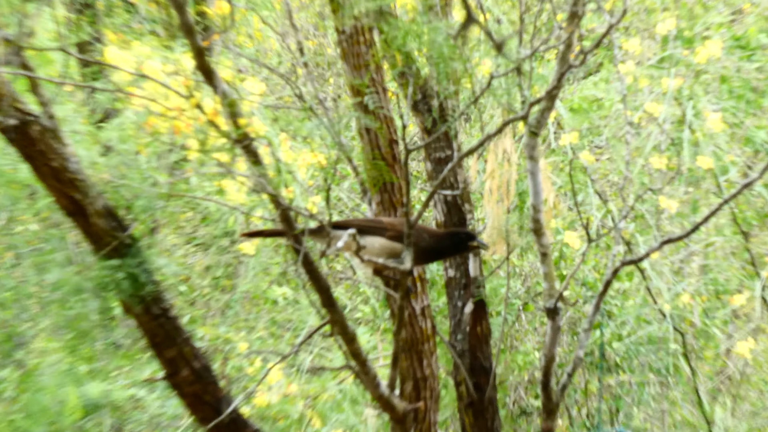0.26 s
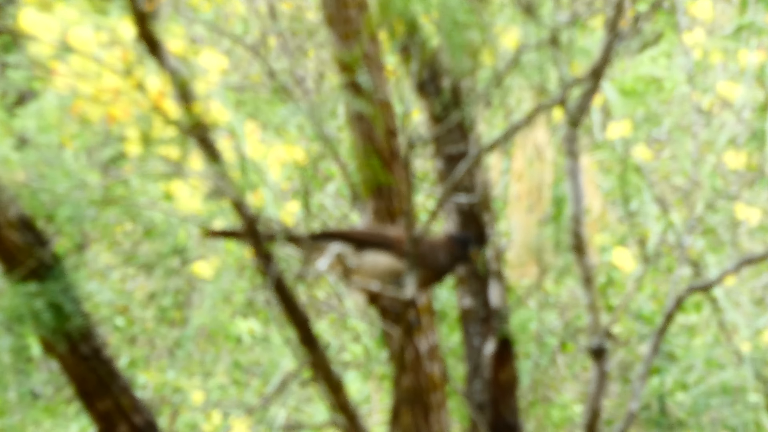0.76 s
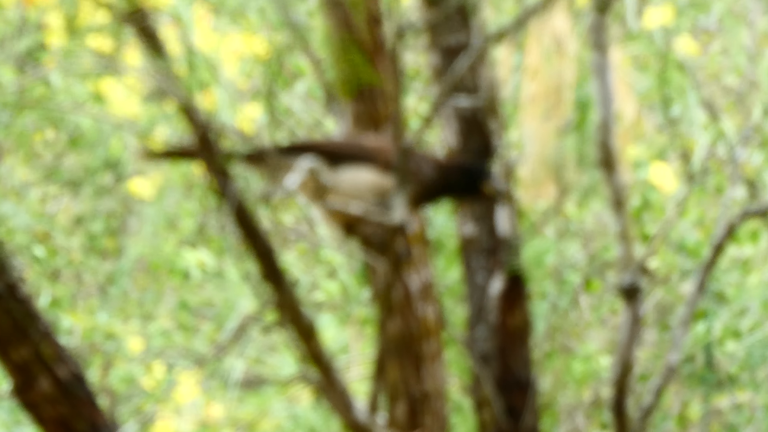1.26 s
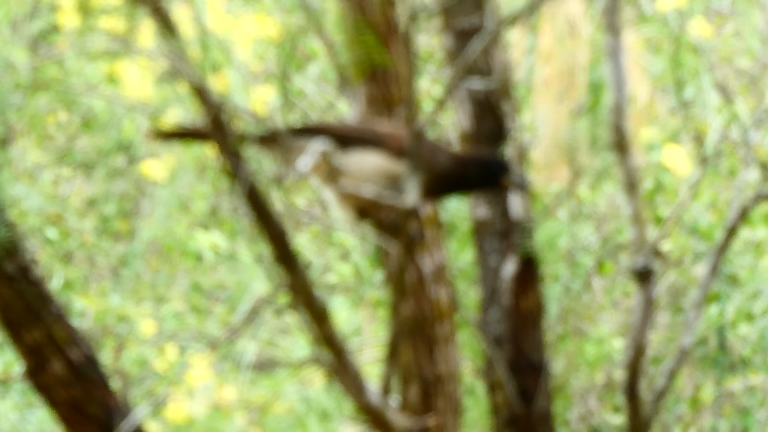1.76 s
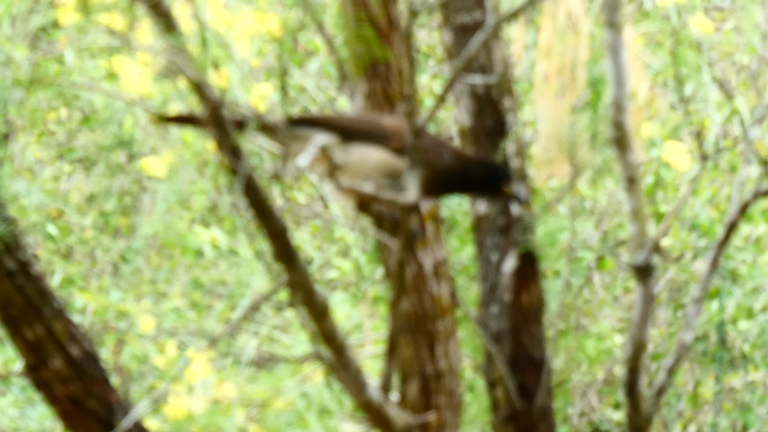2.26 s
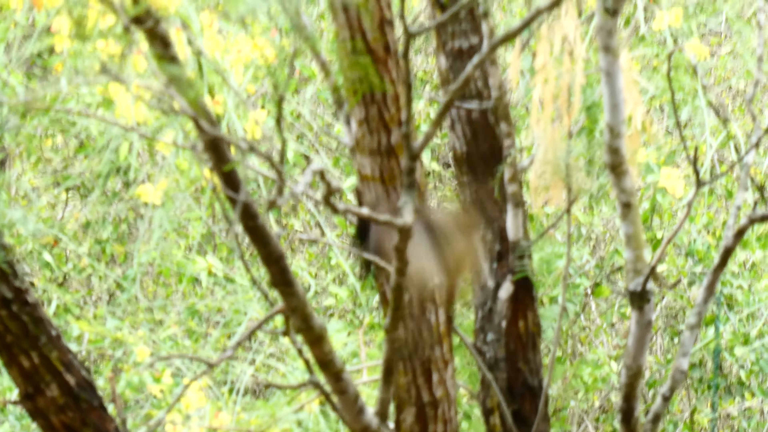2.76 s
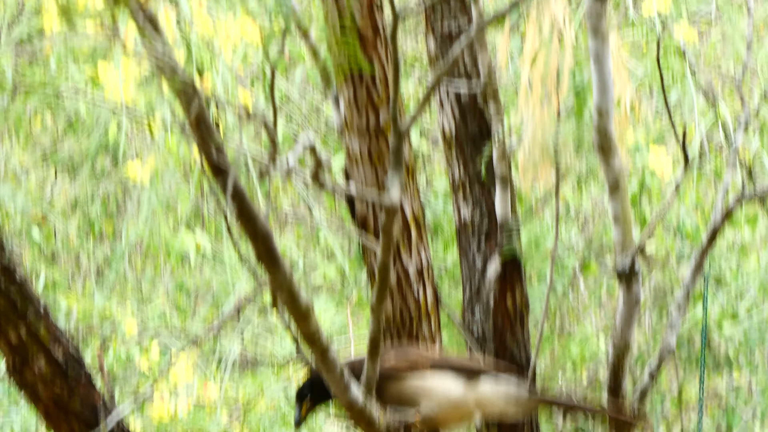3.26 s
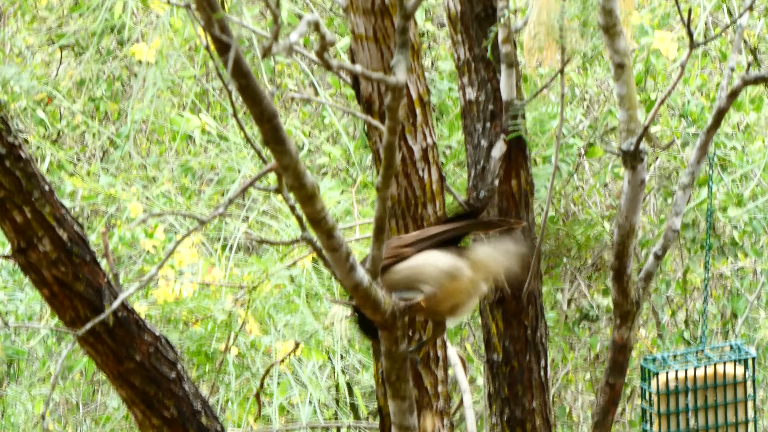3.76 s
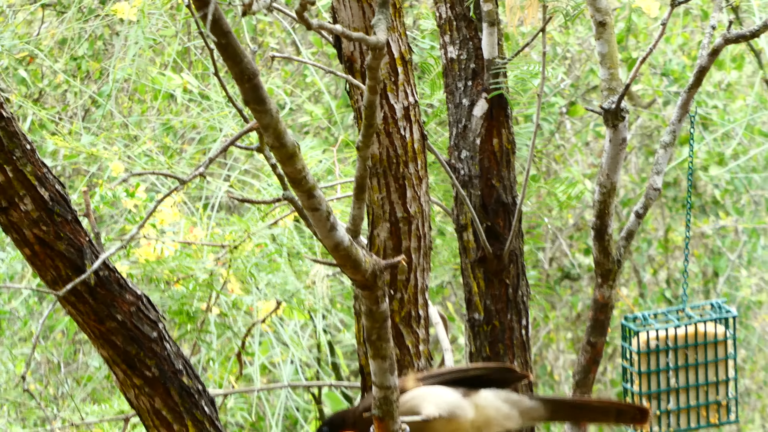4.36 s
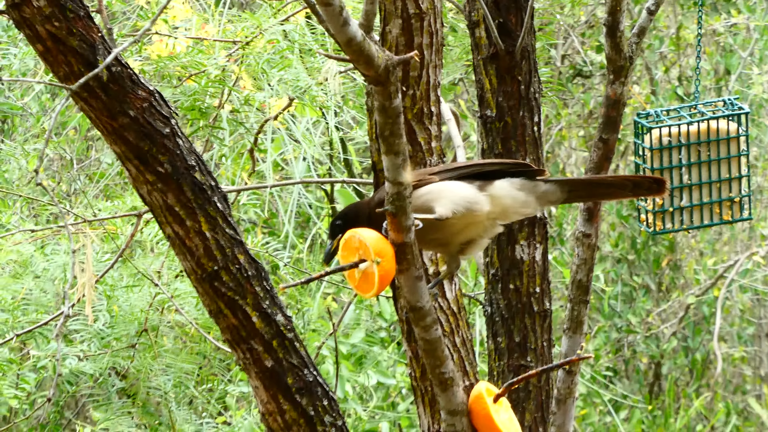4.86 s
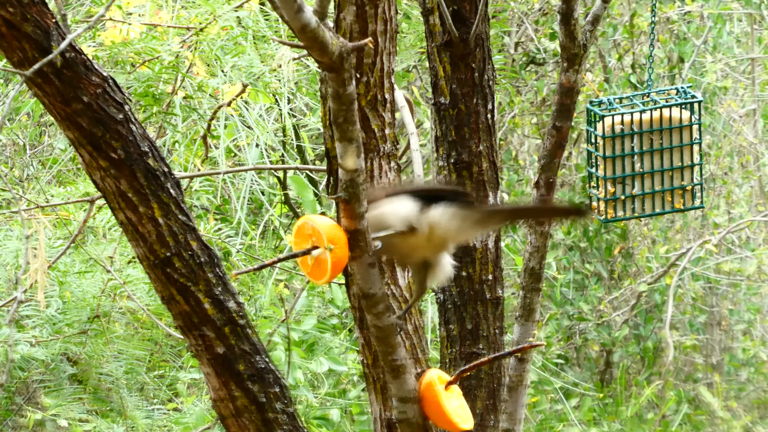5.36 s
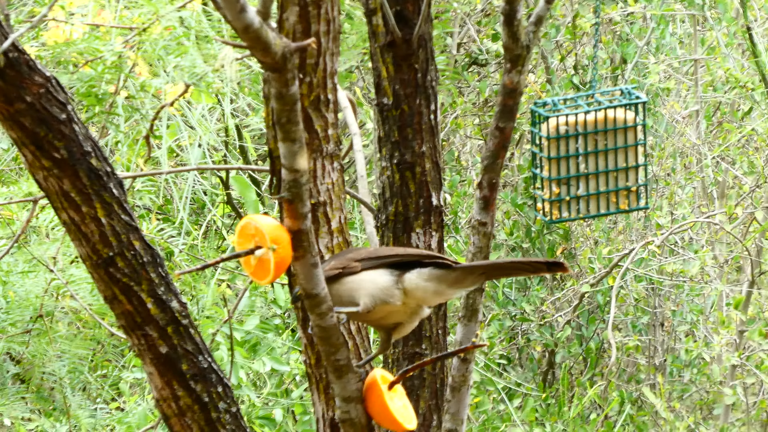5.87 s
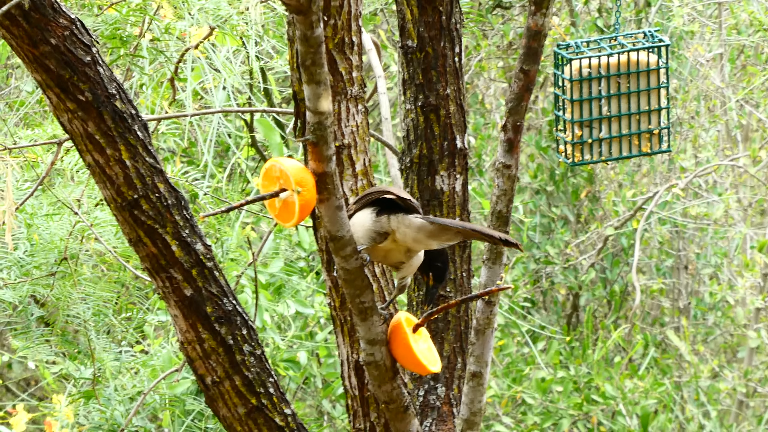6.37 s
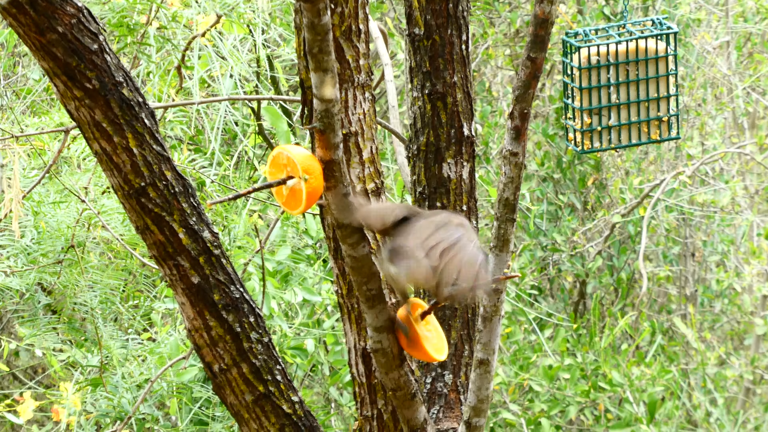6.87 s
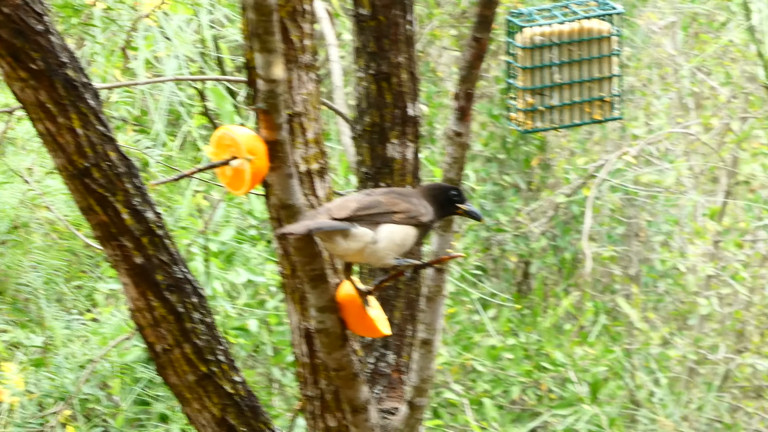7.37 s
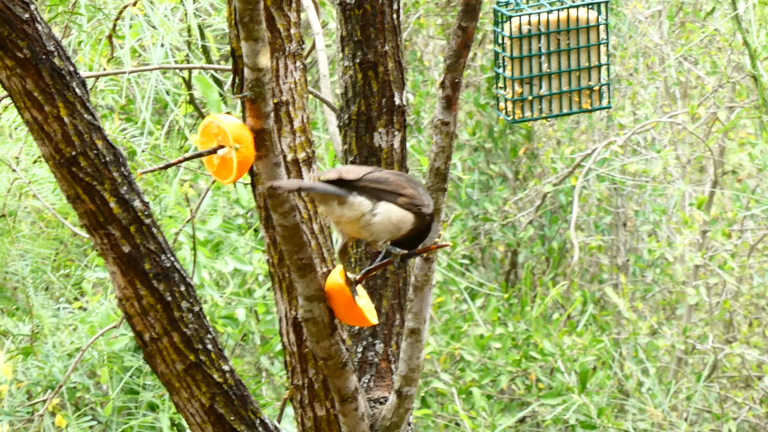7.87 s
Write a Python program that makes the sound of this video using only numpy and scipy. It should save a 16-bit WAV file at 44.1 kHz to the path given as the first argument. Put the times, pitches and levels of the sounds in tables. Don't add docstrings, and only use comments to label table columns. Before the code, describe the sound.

Four rough, nasal jay screams come first, close and bright, with a short woodland echo. Then the place is quiet: a low, throbbing frog hum, thin insect noise and gentle leaf hiss. Far small birds give a tumbling trill, scattered peeps and three brief warbling songs. Small dry clicks and loose lens rattles betray the hand-held camera microphone near the end.

```python
import sys
import numpy as np
from scipy import signal
from scipy.fft import rfft, irfft, next_fast_len
from scipy.io import wavfile
from scipy.ndimage import uniform_filter1d, map_coordinates

SR = 44100
rng = np.random.default_rng(int(sys.argv[2]) if len(sys.argv) > 2 else 0)


def waveform_to_disk(signal):
    frames = np.transpose(np.atleast_2d(signal))
    scaled = np.clip(frames, -1, 1) * 32767
    samples = np.round(scaled).astype(np.int16)
    wavfile.write(sys.argv[1], SR, samples)


def nominal_scale(level):
    x = np.asarray(level, float) / 20
    return 10 ** x


N = 357651
T = np.arange(N) / SR
TOP_HZ = 15750
CALLING = N // 3


def unit(x):
    return x / np.sqrt(np.mean(x ** 2) + 1e-20)


def along(points, hz):
    f, v = np.transpose(points)
    return np.interp(np.log(hz + 1), np.log(f + 1), v)


def curves(rows):
    s, *cols = np.transpose(rows)
    return [np.interp(T, s, c) for c in cols]


def wobble(rate_hz, size=N):
    knots = rng.standard_normal(int(N * rate_hz / SR) + 4)
    return map_coordinates(knots, [T[:size] * rate_hz])


def filtered(x, response):
    m = next_fast_len(N + SR // 2)
    return irfft(rfft(x, m) * response(np.fft.rfftfreq(m, 1 / SR)), m)[..., :N]


def resonances(modes):
    def response(f):
        total = 0
        for k, (centre, width, db) in enumerate(modes):
            loss = 1j * f * abs(width)
            total = total + (-1) ** k * nominal_scale(db) * loss / (centre * centre - f * f + loss)
        return total
    return response


def add(track, s, sound):
    track[round(s * SR):][:len(sound)] += sound


def progress(length_s):
    return np.arange(round(length_s * SR)) / (length_s * SR)


def sine(hz):
    return np.sin(2 * np.pi * np.cumsum(hz) / SR)


# start_s, voice_clears_s, voice_breaks_s, end_s, start_roughness (0-1)
CRIES = [
    (0, .06, .175, .4, .2),
    (.72, .835, .97, 1.075, .8),
    (1.27, 1.4, 1.5, 1.69, .8),
    (1.88, 1.975, 2.07, 2.235, .9),
]


def through_cries(start, clears, breaks, end):
    stages = (start, clears, breaks, end)
    return curves([(s, v) for cry in CRIES for s, v in zip(cry, stages)])[0]


CLEAR = (.13, .14, .08, .07)


def roughness():
    settle_s, break_s = .025, .045
    points = []
    for (start, clears, breaks, end, hoarse), clear in zip(CRIES, CLEAR):
        points += [(start, hoarse), ((start + clears) / 2, .46 * hoarse),
                   (clears - settle_s, max(hoarse / 3, clear)),
                   (clears, clear), (breaks, clear), (breaks + break_s, .62), (end, .85)]
    return curves(points)[0]


# time_s, level_db, mouth_khz
EFFORT = [
    [(0, -23.5, 1.9), (0.022, -26.5, 3.4), (0.036, -36.5, 2.1), (0.076, -27.5, 3.6), (0.105, -29.5, 3.8),
     (0.16, -32.0, 1.85), (0.22, -39, 1.75), (0.33, -50.5, 1.4), (0.4, -55.5, 2.26)],
    [(0.72, -60.5, 1.75), (0.772, -29.5, 2.2), (0.8, -36, 1.7), (0.83, -38.5, 2.94), (0.89, -30.5, 3.55),
     (0.914, -35, 2.46), (0.952, -36, 1.7), (1.025, -49.5, 1.85), (1.075, -63, 2.6)],
    [(1.275, -57, 2.2), (1.315, -29.5, 2.35), (1.356, -35.1, 2.85), (1.39, -25.5, 4.56),
     (1.426, -28.5, 1.6), (1.468, -27.5, 1.68), (1.49, -32.5, 2.18), (1.55, -39, 2.76), (1.69, -55, 4.7)],
    [(1.88, -57, 2.1), (1.914, -27, 2.06), (1.965, -28.5, 3.42), (1.98, -30.5, 2.65), (2.02, -27.5, 2.3),
     (2.06, -27, 2.24), (2.09, -33, 1.83), (2.12, -39, 1.8), (2.235, -50.5, 2.43)],
]
# time_s, hollow_khz
HOLLOW = [
    [(0, 3.6), (.024, 3.6), (.034, 2.3), (.092, 2.4), (.115, 3.4), (.14, 2.8), (.175, 5.35), (.22, 5.6),
     (.36, 6.5)],
    [(.745, 2.2), (.785, 2.25), (.8, 2.3), (.815, 2.3), (.885, 1.5), (.92, 4), (.98, 4.1), (1.07, 4.3)],
    [(1.29, 1.3), (1.325, 1.7), (1.36, 2.03), (1.39, 7.3), (1.42, 6.9), (1.46, 6.1), (1.488, 2.5),
     (1.525, 1.9), (1.59, 3.8)],
    [(1.905, 1.51), (1.93, 2.2), (1.968, 1.38), (1.99, 4.2), (2.012, 4.2), (2.045, 4.9), (2.08, 3.0),
     (2.11, 6.1), (2.17, 4.5)],
]
# freq_hz, level_db
WINDPIPE = [(1500, -3), (2000, 0.1), (2400, 1.5), (3100, 0.1), (3700, -4), (4400, 3), (5000, -3),
            (6200, -13)]


def overtones(hz):
    mouth_octaves, hollow_octaves = .44, .24
    n = len(hz)
    effort_db, mouth_khz = [c[:n] for c in curves(np.vstack(EFFORT))]
    hollow_khz = curves(np.vstack(HOLLOW))[0][:n]
    chest_db = through_cries(-43, -21, -13, -11)[:n]
    pitches = np.arange(2, 6)[:, None] * hz

    def near(khz, octaves):
        return np.exp(-(np.log2(pitches / 1000 / khz) / octaves) ** 2)

    colour_db = along(WINDPIPE, pitches)
    colour_db = colour_db + 12 * near(mouth_khz, mouth_octaves)
    colour_db += 5 * near(2 * mouth_khz, mouth_octaves / 2)
    colour_db -= 19 * near(hollow_khz, hollow_octaves)
    total_db = 10 * np.log10(np.sum(nominal_scale(colour_db) ** 2, axis=0))
    return effort_db + chest_db, effort_db + colour_db - total_db


# time_s, pitch_hz
PITCH = [
    [(0, 1198), (.027, 1173), (.032, 1118), (.115, 1066), (.172, 1000), (.182, 878), (.27, 847),
     (.276, 949), (.36, 864)],
    [(.72, 761), (.76, 942), (.765, 1136), (.8, 1115), (.81, 1036), (.84, 1008), (.885, 996), (.955, 910),
     (1.07, 895)],
    [(1.304, 954), (1.306, 1198), (1.336, 1180), (1.341, 1070), (1.395, 1105), (1.407, 1040), (1.462, 1011),
     (1.482, 880.7), (1.69, 712)],
    [(1.91, 921), (1.912, 1227), (1.97, 1221), (1.972, 1041), (2.064, 982), (2.073, 921), (2.1, 928),
     (2.112, 879), (2.23, 850)],
]
# freq_hz, density_db_per_hz
THROAT = [(590, -57), (1000, -18.5), (1600, -21), (1770, -8), (2160, -9), (2420, -3), (3040, 0.5),
          (3370, -40), (3960, 0.5), (4390, 3.5), (7530, -29.5), (8840, -9), (15500, -36)]
# freq_hz, level_db
HIGH = [(5500, -26), (7000, -29.5), (9000, -26), (11000, -32), (15000, -50)]
SHINE_DB = (1.5, 1.5, 0.5, -0.5)


def jay():
    n = CALLING
    hz = curves(np.vstack(PITCH))[0][:n]
    chest_db, overtone_db = overtones(hz)
    rough = roughness()[:n]
    gate = sum((T[:n] >= start) & (T[:n] <= end) for start, _, _, end, _ in CRIES) * 1.
    gate = uniform_filter1d(gate, size=400, mode="nearest")
    jitter = .004 * wobble(70, n) + .055 * rough * wobble(500, n)
    phase = 2 * np.pi * np.cumsum(hz * (1 + jitter)) / SR
    effort = uniform_filter1d(np.sqrt(sum(nominal_scale(db) ** 2 for db in overtone_db)), size=600)
    shine_rows = [(s, db) for cry, db in zip(CRIES, SHINE_DB) for s in (cry[0], cry[3])]
    shine_db = curves(shine_rows)[0][:n]
    upper_db = 20 * np.log10(effort) + shine_db
    levels = [chest_db, *overtone_db] + [upper_db + along(HIGH, k * hz) for k in range(6, 16)]

    flutter_db = 2.5 * rough * wobble(260, n)
    tone = 0
    for k, db in enumerate(levels, 1):
        slow_db = min(.6 * k, 2) * wobble(55, n)
        fast_db = (3.5 * rough + .3 * k) * np.clip(wobble(160, n), -3, 1.3)
        level = np.sqrt(2) * nominal_scale(db + flutter_db + slow_db + fast_db) * (k * hz < TOP_HZ)
        tone = tone + level * np.sin(k * phase + k * k)

    breath = rng.standard_normal(n) * (1 + .7 * np.cos(phase))
    rasp = unit(filtered(breath, lambda f: nominal_scale(along(THROAT, f)) * (f > 900))[:n])
    share = .07 + .9 * rough
    hiss = signal.sosfiltfilt(signal.butter(2, 6000, "highpass", fs=SR, output="sos"), rasp)
    hiss_share = nominal_scale(shine_db) * (.15 + share / 2)
    noise = nominal_scale(flutter_db) * effort * (share * (rasp - hiss) + hiss_share * hiss)
    return np.pad(gate * (tone + noise), (0, N - n))


# start_s, length_s, pitch_hz, level_db
OTHER_SIDE = [
    (0.033, 0.017, 1190, -34.5),
    (.758, 0.045, 1205, -29),
    (1.301, 0.062, 1080, -32.5),
    (1.367, 0.022, 1200, -38),
    (1.96, 0.059, 1120, -31.5),
    (0.18, 0.086, 1100, -51),
    (2.2, 0.099, 1090, -53),
    (0.44, .1, 1030, -52),
]
# freq_hz, level_db
OTHER_COLOUR = [(2200, -14), (2400, 1), (3300, -15), (4400, -2.5), (4800, -7), (5400, -11), (6600, -17.5)]
# start_s, level_db
PUFFS = [
    (0.724, -57),
    (1.281, -48),
    (1.882, -42.5),
]


def other_side():
    out = np.zeros(N + SR)
    shake, *ragged = [wobble(rate, CALLING) for rate in (400, 150, 150, 150, 150, 150)]
    for s, length, hz, db in OTHER_SIDE:
        cut = slice(round(s * SR), round((s + length) * SR))
        phase = 2 * np.pi * np.cumsum(hz * (1 + .016 * shake[cut])) / SR
        stack = sum(nominal_scale(db + along(OTHER_COLOUR, k * hz) + 5 * r[cut]) * np.sin(k * phase)
                    for k, r in enumerate(ragged, 2))
        add(out, s, np.hanning(len(phase)) ** .5 * stack)
    band = signal.butter(2, [200, 1300], "bandpass", fs=SR, output="sos")
    for s, db in PUFFS:
        puff = signal.sosfilt(band, rng.standard_normal(900))
        add(out, s, nominal_scale(db + 10) * np.hanning(900) * puff)
    return out[:N]


# freq_hz, t60_s
WOOD = [(500, 0.047), (2500, 0.55), (6000, 0.35), (12000, 0.11)]


def wood(x, alike):
    hz, t, z = signal.stft(rng.standard_normal((2, SR)), SR, nperseg=256)
    decay = nominal_scale(-60 * t / along(WOOD, hz)[:, None])
    a, b = signal.istft(z * decay, SR, nperseg=256)[1]
    spread = (1 - alike) * b
    tail = np.array([a + spread, a - spread]) / np.linalg.norm(a)
    return signal.fftconvolve(np.pad(x, (600, 0))[None], tail, axes=1)[:, :N]


# freq_hz, correlation
ALIKE = [(40, -0.32), (120, 0.78), (250, -0.87), (500, 0.53), (1500, 0.59), (5000, 0.93), (9000, 0.85),
         (15000, 0.099)]


def stereo_noise(gain):
    def response(hz):
        turn = np.arccos(np.clip(along(ALIKE, hz), -1, 1)) / 2
        return gain(hz) * [np.cos(turn), np.sin(turn)]
    mid, side = filtered(rng.standard_normal((2, N)), response)
    return unit(np.array([mid + side, mid - side]))


# freq_hz, density_db_per_hz
AIR = [(25, -30), (60, -26.5), (200, -11.5), (400, -5.5), (600, 1), (900, -5), (1500, -10), (3000, -14.5),
       (4500, -11.5), (7000, -13.5), (10000, -13.5), (15700, -21)]
# time_s, level_db
AIR_DB = [
    (0, -67.5),
    (2.57, -69),
    (5.8, -69),
    (6.48, -67),
    (8.11, -69),
]


def leaves():
    ring_db = through_cries(0, 4, 4, 0)
    level_db = curves(AIR_DB)[0] + ring_db + 9.5 + 0.18 * wobble(1.68)
    return nominal_scale(level_db) * stereo_noise(lambda f: nominal_scale(along(AIR, f)))


# freq_hz, width_hz, level_db
INSECTS = [
    (5437, 530, -66),
    (8345, 1000, -62),
    (2230, 400, -68),
    (2890, 130, -71.5),
]


def insects():
    out = 0
    for hz, width, db in INSECTS:
        band = stereo_noise(lambda f: np.exp(-((f - hz) / width) ** 2))
        out = out + nominal_scale(db + 0.84 * wobble(5.045)) * band
    return out


# peak_s, level_db
CROAKS = [(.403, -57), (.495, -33), (.595, -27), (.69, -44), (.78, -54), (.865, -55), (.96, -43),
          (1.031, -48), (1.1, -44), (1.185, -53), (1.27, -44), (1.355, -52), (1.45, -43), (1.535, -52),
          (1.625, -60), (1.71, -53), (1.8, -45), (1.89, -36), (1.98, -50), (2.07, -53), (2.166, -45),
          (2.25, -51), (2.341, -45), (2.439, -38), (2.522, -45), (2.613, -47), (2.694, -40), (2.773, -39),
          (2.839, -56), (2.919, -65), (3.024, -50), (3.11, -61), (3.226, -68), (3.3, -54), (3.425, -49),
          (3.515, -47), (3.607, -50), (3.689, -46), (3.788, -38), (3.876, -42), (3.969, -50), (4.047, -39),
          (4.129, -50), (4.235, -46), (4.309, -48), (4.398, -54), (4.474, -47), (4.556, -47), (4.629, -42),
          (4.727, -43), (4.81, -39), (4.879, -64), (4.989, -54), (5.046, -62), (5.112, -60), (5.197, -46)]
# time_s, depth (0-1)
THROB = [(0, .8), (2.3, .95), (2.75, .95), (2.95, .55), (3.35, .6), (3.6, .95), (4.1, .9), (5, .75),
         (6, .55), (8.1, .45)]
# time_s, level_db
CHORUS = [
    (0.0, -62),
    (1.31, -60),
    (1.56, -57.5),
    (3.09, -53.5),
    (6.01, -60.5),
    (8.11, -56.5),
]
# freq_hz, width_hz, level_db
FROG = [
    (679.3, 95, 0.5),
    (736.3, 84, 0),
    (1210, 6.2, -9),
]
# time_s, level_db
DEEP_FROG = [
    (0, 1),
    (1.9, -5),
    (2.3, -1),
    (5, 0.5),
    (8.11, 0.5),
]


def frogs():
    beat_s, rise, fall = .0885, .05, .38
    s, db = uniform_filter1d(np.transpose(CROAKS), size=3, mode="nearest")
    beats = np.r_[s[0] - beat_s * np.arange(30, 0, -1), s, s[-1] + beat_s * np.arange(1, 40)]
    beat = np.interp(T + rise * beat_s * 2, beats, np.arange(len(beats))) % 1
    accent_db = .5 * np.interp(T, np.r_[s[0] - .1, s, s[-1] + .1], np.r_[0, db - db.mean(), 0])
    swell = np.clip(beat / rise, 0, 1) * np.exp(-(beat / fall) ** 3) * nominal_scale(accent_db)
    throb = 1 - curves(THROB)[0] * (1 - swell)
    count = np.floor(9 * beat + .9 + .15 * wobble(20))
    clicks = abs(np.diff(count, prepend=0)).clip(0, 1) * nominal_scale(2 * wobble(60))
    drive = unit(clicks) * (.12 + throb * nominal_scale(1.2 * wobble(8)))
    drive = drive + (.12 + .3 * throb) * rng.standard_normal(N)
    throat = resonances([(800, 900, 0)])
    deep_voice, high_voice = resonances(FROG[:1]), resonances(FROG[1:])
    deep = filtered(drive, lambda f: deep_voice(f) * throat(f))
    high = filtered(drive, lambda f: high_voice(f) * throat(f))
    return nominal_scale(curves(CHORUS)[0]) * unit(nominal_scale(curves(DEEP_FROG)[0]) * deep - high)


def thicket():
    out, u = np.zeros(N + SR), np.linspace(0, 1, 2600)
    for s, pitch, glide, size in rng.random((90, 4)):
        hz = 2000 * 2 ** pitch * (1 + .2 * (glide - .65) * u)
        add(out, s * N / SR, nominal_scale(-70 + 6 * size) * np.sin(np.pi * u) * sine(hz))
    return out[:N]


# first_peak_s, warble_db, trill_db, trill_s, grace_share
SONGS = [
    (5.367, -47.5, -47.5, .17, .45),
    (6.268, -48, -47.5, .115, .45),
    (7.298, -48, -51, .1, .6),
]
# start_s, length_s, start_hz, level_db
PLUNGES = [(.56, .025, 5400, -58), (3.97, .075, 6000, -67), (4.69, .09, 6900, -64), (4.81, .045, 4100, -65),
           (4.94, .09, 6500, -64), (5.17, .085, 6500, -65), (5.863, .028, 4250, -54),
           (6.756, .04, 4150, -60), (5.9, .02, 4400, -62), (6.735, .03, 5100, -64), (7.12, .04, 4400, -62),
           (7.258, .027, 3600, -51), (7.318, .02, 3450, -52), (7.366, .022, 3400, -50),
           (7.41, .02, 3300, -52), (5.354, .018, 4250, -55), (5.648, .015, 4500, -62),
           (7.49, .055, 4500, -61), (7.85, .09, 5050, -58)]
SLIDES = [(.27, .045, 5900, -52), (.49, .15, 3700, -63), (2.255, .045, 5050, -56), (2.63, .045, 2900, -59),
          (5.335, .025, 3600, -55), (7.47, .035, 3000, -51), (5.955, .065, 2650, -54),
          (5.885, .03, 3200, -58), (6.845, .05, 2850, -59), (6.778, .05, 4050, -60),
          (6.797, .03, 2500, -56), (7.2, .045, 3950, -61), (7.535, .03, 2600, -57)]
PIPES = [(1.15, .1, 3150, -60), (1.7, .14, 3050, -59), (2.604, .033, 3120, -47.5), (6.0, .025, 3100, -59),
         (6.215, .03, 2420, -54), (6.39, .11, 2950, -51), (2.855, .03, 3180, -57), (2.895, .03, 3170, -60),
         (2.92, .04, 2830, -60), (2.99, .04, 3830, -65), (3.38, .15, 3120, -58), (3.385, .12, 2950, -58),
         (3.262, .025, 3220, -57), (3.285, .07, 2950, -63), (2.655, .05, 3080, -61),
         (2.47, .085, 3950, -55), (3.81, .11, 2880, -55), (3.93, .035, 2700, -60), (4.135, .03, 4150, -63),
         (4.39, .06, 3080, -61), (4.3, .04, 3430, -59), (4.405, .07, 3540, -56), (4.55, .03, 2980, -64),
         (5.17, .06, 3150, -60), (5.31, .03, 4620, -63), (7.24, .03, 4620, -63), (6.82, .035, 3950, -64)]
LIFTS = [(2.344, .011, 3000, -49), (2.348, .008, 3300, -53), (2.362, .011, 3400, -49),
         (2.36, .02, 3950, -56), (2.59, .014, 2650, -55), (5.715, .025, 3600, -59), (2.82, .04, 2500, -60),
         (3.765, .045, 2400, -60), (4.37, .035, 3100, -63), (6.82, .12, 2500, -59)]
COOS = [
    (5.3, .3, 1250, -69),
    (6.19, .16, 1270, -65),
]


def whistles(quaver_hz):
    notes = []
    for table, hz_per_s in ((PLUNGES, -34000), (SLIDES, -12000), (PIPES, -1500), (LIFTS, 11500), (COOS, -200)):
        notes += [(s, length, hz, hz + hz_per_s * length, db) for s, length, hz, db in table]
    for s, db, *_ in SONGS:
        notes.append((s - .07, .02, 2450, 3400, db - 9.5))
        notes.append((s - .057, .035, 2330, 2330, db - 8))
    out = np.zeros(N + SR)
    for s, length, start_hz, end_hz, db in notes:
        u = progress(length)
        hz = start_hz + (end_hz - start_hz) * u + quaver_hz[round(s * SR):][:len(u)]
        add(out, s, nominal_scale(db + 1) * np.sin(np.pi * u) ** .6 * sine(hz))
    return out


def cascade():
    length_s, dips_per_s, level_db = .225, 55, -45
    u = progress(length_s)
    dip = np.sin(np.pi * u * length_s * dips_per_s) ** 2
    crest_hz = np.interp(u, [0, 1], (4300, 3950))
    hz = crest_hz - dip * np.interp(u ** .6, [0, 1], (150, 1600))
    swell = np.sin(np.pi * u ** .5) ** 1.2 * (1 - u ** .6 * (1 - dip))
    return nominal_scale(level_db) * swell * sine(hz)


def warbles(quaver_hz):
    parts = []  # start_s, level_db, length_s, beats_per_s, low_hz, high_hz, grace_share
    for s, db, trill_db, trill_s, grace in SONGS:
        parts.append((s, db, .21, 20.3, 2280, 3200, grace))
        parts.append((s + .122, trill_db, trill_s, 43.5, 2780, 3150, 0))
    out = np.zeros(N + SR)
    for s, db, length, rate, low_hz, high_hz, grace in parts:
        u = progress(length)
        beat = u * length * rate % 1
        leap = np.where(beat < .35, (beat / .35) ** 1.3, np.exp(-(beat - .35) / .13))
        hz = low_hz + (high_hz - low_hz) * leap + 1.6 * quaver_hz[round(s * SR):][:len(u)]
        pulse = .3 + .75 * np.exp(-((beat - .47) / .2) ** 2)
        grace_swell = grace * np.exp(-((beat - .62) / .09) ** 2)
        high = grace_swell * sine(1.33 * high_hz - 150 * u - 900 * beat)
        swell = np.sin(np.pi * u ** .45) ** .4
        add(out, s - .35 / rate, nominal_scale(db) * swell * (pulse * sine(hz) + high))
    return out


def songbirds():
    quaver_hz = 70 * wobble(80)
    out = whistles(quaver_hz) + warbles(quaver_hz)
    add(out, 2.372, cascade())
    return out[:N] * nominal_scale(2 * wobble(140))


# start_s, peak_db, body_db
TICKS = [(0.422, -47.5, -15), (0.616, -47, -6), (0.6732, -46, -2), (5.935, -60.5, 11.5),
         (0.9832, -53, 11.5), (1.066, -56, 12), (1.076, -65, 9), (1.1409, -61, 10), (1.1732, -52, -31),
         (1.239, -60.5, 9.5), (5.8814, -51, -6), (5.996, -34.5, -23), (6.016, -53, -3)]
TICK_T = np.arange(1300) / SR


def ticks():
    t = TICK_T
    bright, body = np.zeros((2, N + SR))
    for s, db, body_db in TICKS:
        crack = rng.standard_normal((2, len(t))) * nominal_scale(-60 * t / 0.014) * (1 - np.exp(-t / 0.00035))
        add(bright, s, nominal_scale(db + 10.5) * crack[0])
        add(body, s, nominal_scale(db + body_db + 16) * crack[1])
    casing = resonances([(9500, 1700, 0.0), (12100, 3000, 0.0), (14500, 2500, -10)])
    shell = resonances([(2200, 2800, 1.0), (4200, 4900, -2.2)])
    return filtered(bright[:N], casing) + filtered(body[:N], shell)


# start_s, pitch_hz, level_db
KNOCKS = [
    (5.883, 908, -36.5),
    (6.352, 441, -40.5),
]


def knocks():
    t, out = TICK_T, np.zeros(N + SR)
    for s, hz, db in KNOCKS:
        add(out, s, nominal_scale(db - 60 * t / 0.021) * (1 - np.exp(-t / 0.0013)) * np.sin(2 * np.pi * hz * t))
    return out[:N]


# start_s, peak_db
RATTLE = [(6.415, -30.5), (6.502, -28), (6.532, -29), (6.556, -32.5), (6.5735, -29), (6.5814, -31.5),
          (6.607, -43), (6.6228, -34.5), (7.0392, -33.5), (7.05, -31.5), (7.133, -28.5), (7.156, -30),
          (7.1805, -33), (7.204, -28.5), (7.2341, -32), (7.639, -37), (7.6535, -31.5), (7.7359, -29),
          (7.7564, -29.5), (7.8057, -30), (7.832, -33.5)]
# freq_hz, width_hz, level_db
LENS = [(1000, 160, -3), (2110, 570, -1.5), (5350, 760, -0.5), (8700, 3900, -9.5), (12000, 8200, -16)]


def rattle():
    t, out = TICK_T, np.zeros(N + SR)
    burst = (t / 0.0022) ** 2 * np.exp(-t / 0.0013) + 0.081 * np.hanning(len(t))
    for s, db in RATTLE:
        add(out, s - .002, nominal_scale(db + 11) * rng.standard_normal(len(t)) * burst)
    return filtered(out[:N], resonances(LENS))


def scene():
    near = jay() + other_side()
    near = near * nominal_scale([[.2], [-.2]]) + nominal_scale(-11.5) * wood(near, alike=0.87)
    background = leaves() + insects() + frogs() * nominal_scale([[-.6], [.6]])
    far = thicket() + songbirds()
    far = far + nominal_scale(-4) * wood(far, alike=.75)
    return near + background + far + ticks() + knocks() + rattle()


def roll_off(x):
    return signal.sosfilt(signal.butter(12, 15730, fs=SR, output="sos"), x)


def record(dry):
    mix = filtered(dry, lambda hz: hz < TOP_HZ)
    return roll_off(mix)


dry = scene()
out = record(dry)
waveform_to_disk(out)
```